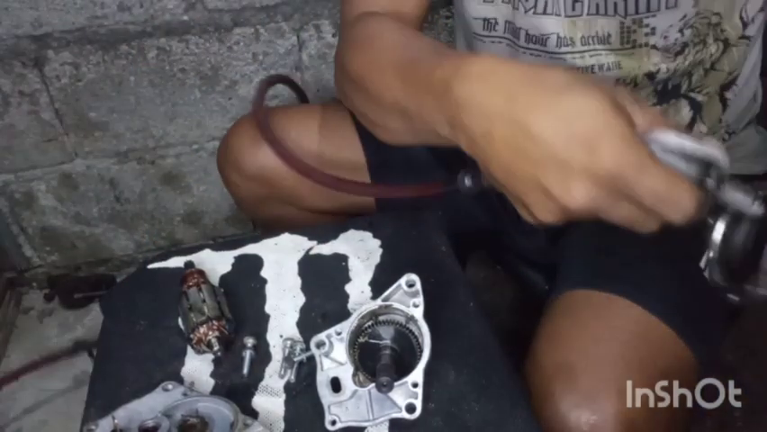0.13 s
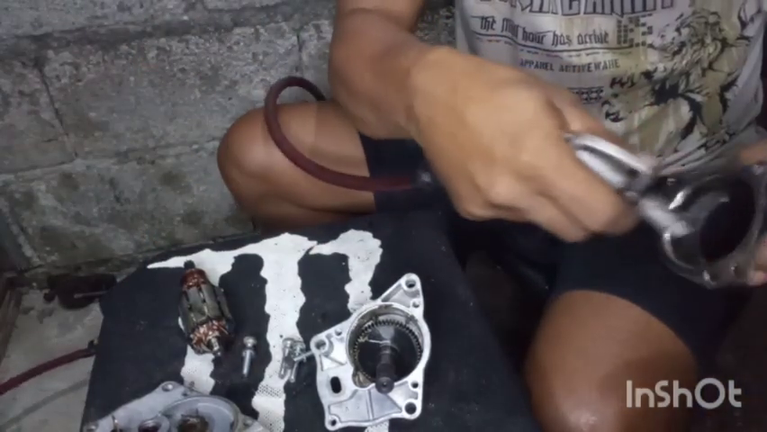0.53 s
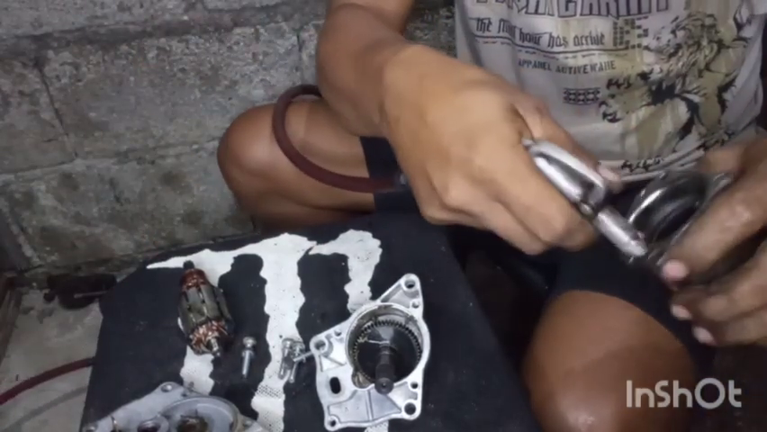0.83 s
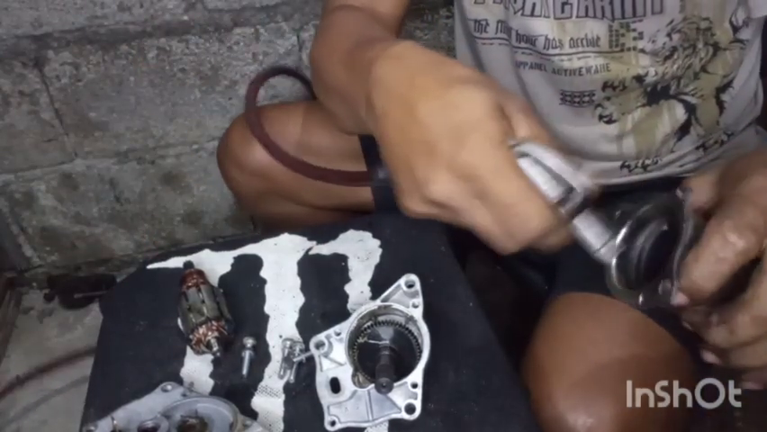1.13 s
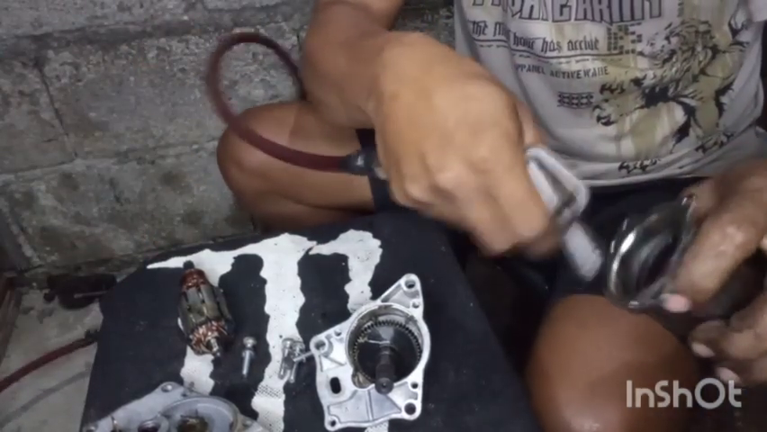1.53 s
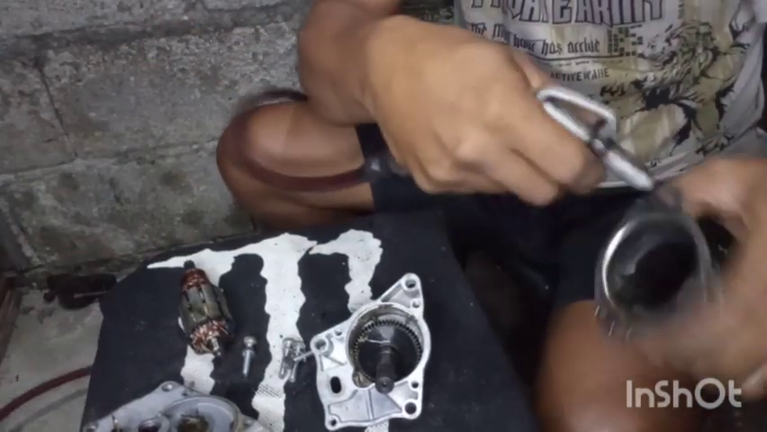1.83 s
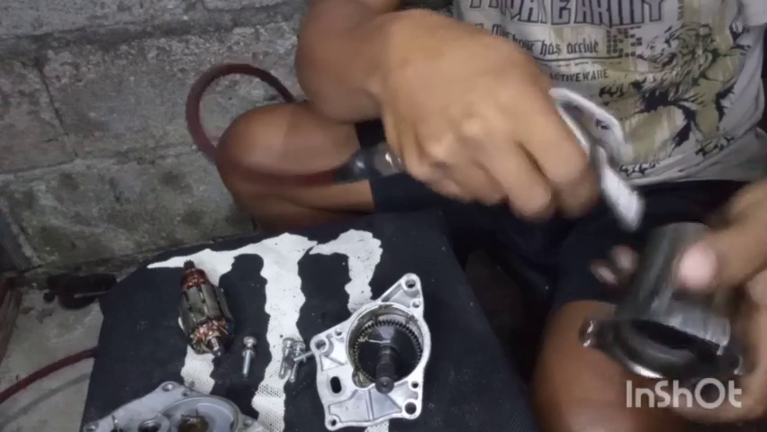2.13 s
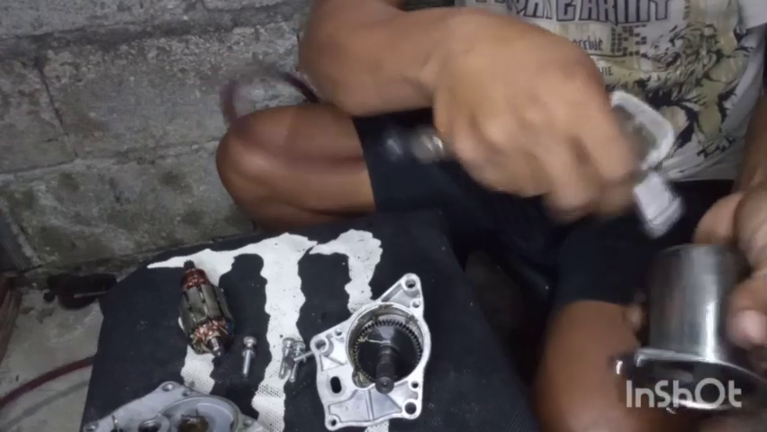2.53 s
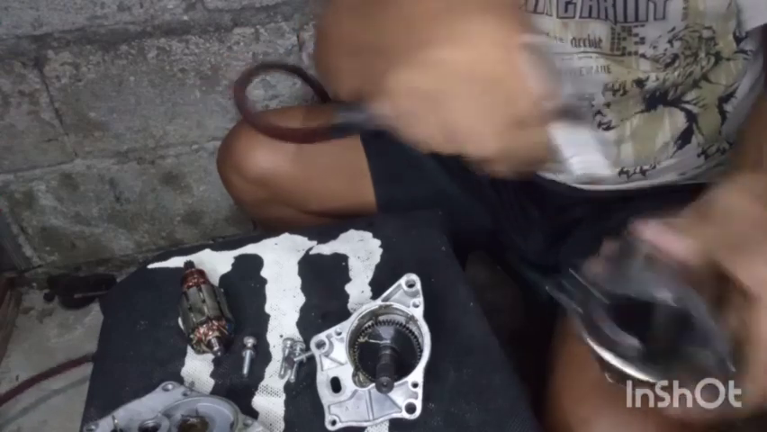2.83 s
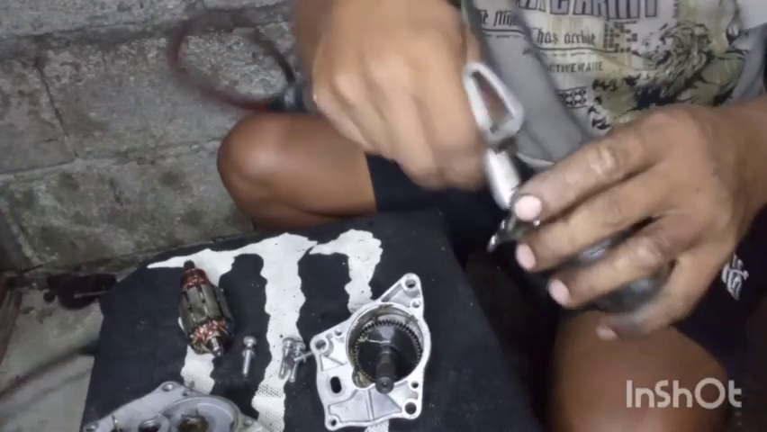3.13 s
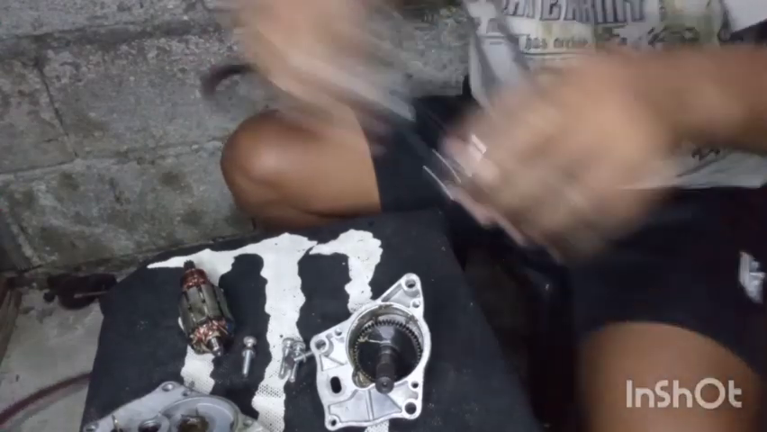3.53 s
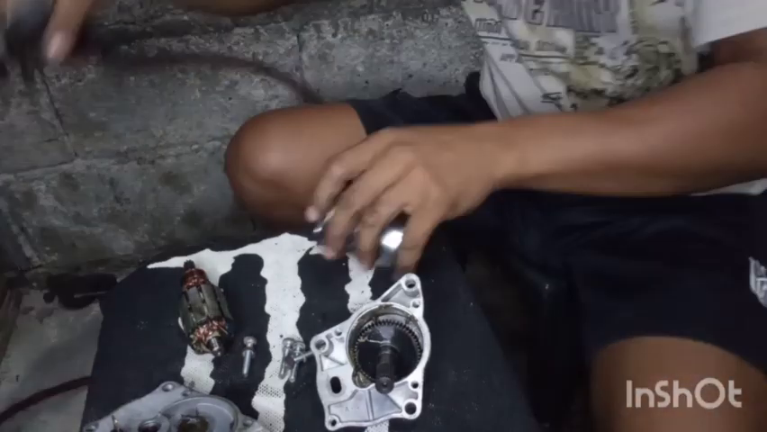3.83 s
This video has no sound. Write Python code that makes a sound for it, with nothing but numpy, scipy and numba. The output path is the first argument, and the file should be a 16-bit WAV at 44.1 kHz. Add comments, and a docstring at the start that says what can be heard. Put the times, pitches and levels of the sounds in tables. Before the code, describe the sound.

Compressed air hisses loudly from a blow gun, with a thin whistle and brief flares as it rushes over a steel motor housing. It stops abruptly, and the part is set down with a dull thump, close by in a small room.

```python
"""A blow gun cleans a steel motor housing, turned in the hand close to the microphone in a small concrete room.
The jet hisses through the nozzle's resonances, flares briefly, rushes over the metal and sounds its
hollow; air thrown back buffets the microphone. The valve shuts, the room rings briefly, and the part
is put down on a padded board with a dull thump and some faint ringing."""
import sys
import numpy as np
from scipy import signal
from scipy.io import wavfile
from scipy.ndimage import uniform_filter1d, map_coordinates
from numba import njit

SR = 44100
rng = np.random.default_rng(int(sys.argv[2]) if len(sys.argv) > 2 else 0)


def to_wav(sig):
    """Store sig (one row per channel, or 1-D mono) as 16-bit WAV at the path in sys.argv[1].

    Samples outside -1..1 are clipped; the rate is SR.
    """
    pcm = np.clip(np.atleast_2d(sig), -1, 1) * 32767
    pcm = np.round(pcm).astype(np.int16)
    wavfile.write(sys.argv[1], SR, pcm.T)  # frames by channels


N = 176400
T = np.arange(N) / SR


def from_db(db):
    """Decibels to gain."""
    return 10 ** (np.asarray(db) / 20)


def rms_one(x):
    """Scale to unit power."""
    return x / np.sqrt(np.mean(x ** 2) + 1e-20)


def evened(x, window_s=.02):
    """Hold the level of a narrow sound steady from moment to moment."""
    return x / np.sqrt(uniform_filter1d(x ** 2, int(window_s * SR)) + 1e-6)


def level(rows):
    """Gain over time from rows of seconds and dB."""
    return from_db(np.interp(T, *np.transpose(rows)))


def swell(peak_s, half_s):
    """Bell-shaped rise and fall."""
    return np.exp(-.5 * ((T - peak_s) / half_s) ** 2)


def drift(rate_hz):
    """Smooth random wander with spread 1."""
    r = np.exp(-40 * np.pi * rate_hz / SR)
    slow = signal.lfilter([1], [1, -2 * r, r * r], rng.standard_normal(N // 20 + 4002))[4000:]
    return np.interp(np.arange(N) / 20, np.arange(len(slow)), rms_one(slow))


def flutter(depth_db, rate_hz):
    """Turbulent gain of unit power."""
    return rms_one(from_db(depth_db * drift(rate_hz)))


@njit
def resonate(x, angle, r):
    """Two-pole resonance with a moving centre."""
    y = np.zeros(len(x))
    for i in range(2, len(x)):
        y[i] = x[i] - x[i - 2] + 2 * r * np.cos(angle[i]) * y[i - 1] - r * r * y[i - 2]
    return y


def blown(hz, width_hz):
    """Turbulence twice through one resonance; unit power."""
    angle = 2 * np.pi * hz / SR * np.ones(N)
    r = np.exp(-np.pi * width_hz / SR)
    return rms_one(resonate(resonate(rng.standard_normal(N), angle, r), angle, r))


def filtered_noise(order, hz, kind, length=N):
    """White noise through a low-, high- or band-pass."""
    return signal.sosfilt(signal.butter(order, hz, kind, fs=SR, output="sos"), rng.standard_normal(length))


def banded_noise(colour, patchy_db):
    """Noise in bands, narrow in the treble, each flickering on its own; unit power."""
    edges = np.r_[np.geomspace(25, 2500, 15), np.arange(3000, 16600, 450)]
    hz, db = np.transpose(colour)
    out = 0
    for low, high in zip(edges, edges[1:]):
        band_db = np.interp(np.log(low * high) / 2, np.log(hz), db)
        out += filtered_noise(2, [low, high], "band") * from_db(band_db + patchy_db * drift(21))
    return rms_one(out)


def room(x, dull_t60_s=.26, bright_t60_s=.22, split_hz=3500, first_echo_s=.012):
    """A diffuse tail between the concrete walls; the treble dies first."""
    age = T[:SR // 2]
    dull = filtered_noise(4, split_hz, "low", len(age)) * from_db(-60 * age / dull_t60_s)
    bright = filtered_noise(4, split_hz, "high", len(age)) * from_db(-60 * age / bright_t60_s)
    tail = (dull + bright) * (age > first_echo_s)
    return signal.fftconvolve(x, tail / np.linalg.norm(tail))[:N]


def close_echoes(x, nearest_s=.001, farthest_s=.0058, sway_s=.00009):
    """Echoes off hands, legs and board sway as the part turns and comb the hiss; its power is kept."""
    out = x.copy()
    for lag in np.geomspace(nearest_s, farthest_s, 7):
        delay = lag * rng.uniform(.9, 1.1) + sway_s * drift(1.3)
        out += from_db(-13.5) * rng.choice([-1, 1]) * map_coordinates(x, [(T - delay) * SR], order=3)
    return rms_one(out) * np.std(x)


# Cloth and hose rustling near the microphone. Each row: time in seconds, level in dB.
RUSTLE_LEVELS = [(3.44, -79), (3.5, -49.5), (3.58, -50), (3.63, -53), (3.69, -52), (3.9, -52.5),
                 (3.95, -50)]
# The rustle's colour. Each row: frequency in Hz, relative density in dB.
RUSTLE_SPECTRUM = [(30, -3), (75, 10.5), (140, -14), (300, 1.5), (600, 1.5), (1300, -10.5), (3000, -16),
                   (4800, -21.5), (6400, -15), (8000, -29.5), (9500, -22), (13000, -36), (16000, -36)]
# The housing's modes under the fingers. Each row: frequency in Hz, relative level in dB.
STEEL_MODES = [(1650, 0.5), (2010, -4), (2440, 0.5), (2900, -2)]
# Faint rings in the handling. Each row: peak in seconds, half length in seconds, pitch in Hz, level in dB.
FAINT_RINGS = [(3.584, 0.026, 579, -49.5), (3.688, 0.014, 230, -53.5), (3.715, 0.025, 2870, -66),
               (3.905, 0.02, 6200, -64), (3.941, 0.011, 1055, -51.5), (3.972, 0.02, 2920, -65),
               (3.976, 0.051, 646, -52)]
def handling(steel_q=55, ring_q=17, wisp_s=3.944, wisp_decay_s=.021):
    """Cloth and hose rustle, fingers rub the steel, faint rings sound and a last wisp of air escapes."""
    steel = sum(from_db(db) * blown(hz, hz / steel_q) * flutter(4.5, rate_hz=20) for hz, db in STEEL_MODES)
    rustle = level(RUSTLE_LEVELS) * (banded_noise(RUSTLE_SPECTRUM, patchy_db=2.5) + from_db(-18) * steel)
    rings = sum(from_db(db) * swell(s, half) * evened(blown(hz, hz / ring_q))
                for s, half, hz, db in FAINT_RINGS)
    wisp_fade = (T > wisp_s) * np.exp(-np.maximum(T - wisp_s, 0) / wisp_decay_s)
    wisp = from_db(-57) * wisp_fade * blown(12000, width_hz=11000)
    return rustle + rings + wisp


# The part landing on the board. Each row: start in seconds, relative level in dB.
CONTACTS = [(3.7785, -32), (3.7853, -28), (3.8268, -47), (3.8377, -42.5)]
# The padded board's modes. Each row: frequency in Hz, relative level in dB, seconds to fall 60 dB.
BOARD_MODES = [(133.5, -0.5, 0.11), (227, 5.5, 0.051), (290, 2.5, 0.03), (516, -3, 0.045),
               (640, -16, 0.045), (1195, -21, 0.059)]
def thump(attack_s=.0008, scuff_decay_s=.01):
    """Each soft contact rings the board's modes and scuffs its cloth, with a faint bright tick."""
    out = np.zeros(N)
    for start, db in CONTACTS:
        age = np.maximum(T - start, 0)
        body = sum(from_db(mode_db - 60 * age / t60) * np.sin(2 * np.pi * hz * age)
                   for hz, mode_db, t60 in BOARD_MODES)
        scuff = from_db(-13) * rms_one(filtered_noise(3, 2300, "low"))
        tick = from_db(-32) * blown(8000, width_hz=14000)
        surface = (scuff + tick) * np.exp(-age / scuff_decay_s)
        out += from_db(db) * (surface - body) * (1 - np.exp(-age / attack_s))
    return out


# Low puffs on the microphone. Each row: peak in seconds, half length in seconds, level in dB.
MIC_PUFFS = [(0.065, 0.014, -36.5), (0.319, 0.018, -42), (0.657, .03, -49), (0.942, 0.03, -47),
             (1.07, 0.02, -46), (2.454, .014, -46), (2.67, 0.042, -44), (2.778, 0.016, -47),
             (3.24, 0.011, -44)]
def puffs():
    """Air thrown back by the part buffets the microphone."""
    gusts = sum(from_db(db) * swell(s, half) for s, half, db in MIC_PUFFS)
    return gusts * evened(blown(186, width_hz=303))


# Air rushing over the metal. Each row: time in seconds, relative level in dB.
RUSH_LEVELS = [(0.0, -36.5), (0.08, -32), (0.1, -46.5), (0.23, -43), (0.26, -51), (0.31, -42),
               (0.44, -48.5), (0.67, -40.5), (0.76, -48.5), (0.94, -40.5), (1.03, -45), (1.07, -39.5),
               (1.2, -47.5), (1.23, -39.5), (1.29, -44.5), (1.35, -41), (1.44, -49.5), (1.49, -45.5),
               (1.68, -49.5), (1.74, -40.5), (1.77, -45.5), (2.01, -43.5), (2.07, -50), (2.15, -39.5),
               (2.17, -43), (2.29, -38.5), (2.33, -41), (2.45, -40), (2.54, -53), (2.58, -42),
               (2.61, -53.5), (2.63, -42.5), (2.71, -39.5), (2.74, -52), (2.78, -41.5), (2.79, -45.5),
               (3.21, -48.5), (3.24, -42.5), (3.29, -59), (3.31, -48), (3.33, -49.5), (3.44, -52.5)]
# The rush's colour. Each row: frequency in Hz, relative density in dB.
RUSH_SPECTRUM = [(30, -19), (70, -9), (140, -1.5), (300, -1), (700, -1.5), (1500, -2.5), (2800, -3),
                 (5000, -15.5), (9000, -8.5)]
def rush():
    """The jet breaks into broad, fluttering turbulence on the housing."""
    turbulence = banded_noise(RUSH_SPECTRUM, patchy_db=2.96) * flutter(depth_db=2, rate_hz=240)
    return from_db(4) * level(RUSH_LEVELS) * turbulence


# Air spraying off the steel. Each row: time in seconds, relative level in dB.
SPRAY_LEVELS = [(0.06, -37), (0.17, -42.5), (0.32, -38.5), (0.8, -40), (1.0, -35.5), (1.06, -40),
                (1.3, -39), (1.6, -39), (1.82, -34), (1.9, -44), (2.29, -40.5), (2.53, -40), (2.6, -44),
                (2.64, -34.5), (2.82, -44), (3.07, -44), (3.19, -39), (3.26, -53.5), (3.44, -55)]
def spray():
    """Air glances off the steel in one wide band of hiss."""
    return from_db(-2.5) * level(SPRAY_LEVELS) * blown(3570, width_hz=2400)


# The housing's cavity resonances. Each row: centre in Hz, width in Hz, relative level in dB.
HOLLOW_MODES = [(1043, 90, 0.5), (1140, 550, -11.5), (1560, 200, -14)]
# How strongly the jet sounds them. Each row: time in seconds, level in dB.
HOLLOW_LEVELS = [(.15, -51), (.27, -42), (.34, -46.5), (.44, -45.5), (.52, -52), (.88, -64), (.99, -41),
                 (1.06, -50), (1.145, -38.5), (1.185, -53), (1.22, -40), (1.275, -43), (1.31, -46.5),
                 (1.355, -35), (1.41, -49.5), (1.5, -43), (1.61, -52), (1.78, -40.5), (1.88, -59),
                 (2.75, -62), (2.94, -38), (3.02, -42.5), (3.15, -50.5), (3.185, -38.5), (3.23, -55),
                 (3.32, -39.5), (3.37, -39.5), (3.42, -50), (3.46, -35)]
def hollow(wander_hz=12):
    """Aimed inside the housing, the jet sounds its hollow."""
    cavity = sum(from_db(db) * blown(hz + wander_hz * drift(3.2), width) for hz, width, db in HOLLOW_MODES)
    return level(HOLLOW_LEVELS) * evened(cavity) * flutter(depth_db=1.9, rate_hz=190)


# Brief swells of hiss. Each row: peak in seconds, half length in seconds, centre in Hz, width in Hz,
# level in dB.
HISS_FLARES = [(0.061, .015, 2900, 4000, -31.5), (0.202, .035, 7400, 900, -36),
               (.32, 0.028, 10470, 700, -30), (.68, .03, 7500, 1500, -34.5), (1.0, 0.1, 8620, 900, -32.5),
               (1.16, .03, 4270, 2210, -32), (1.25, .035, 8300, 1810, -31), (1.44, 0.037, 5000, 2000, -31),
               (1.82, 0.024, 4240, 2300, -30), (2.326, 0.053, 10600, 700, -35),
               (2.669, 0.025, 9900, 900, -21.5), (2.911, .016, 4240, 2190, -31.5),
               (3.023, 0.021, 3660, 2600, -34)]
def flares():
    """Bands of hiss swell briefly: mid-range flares and shrill bursts of the jet's core."""
    return sum(from_db(db) * swell(s, half) * blown(hz, width) for s, half, hz, width, db in HISS_FLARES)


# The nozzle's thin whistle. Each row: time in seconds, level in dB.
THIN_WHISTLE_LEVELS = [(0.0, -30), (0.25, -34), (0.65, -31), (0.8, -27), (0.88, -32), (1.12, -30),
                       (1.6, -31), (1.72, -34.5), (2.08, -29), (2.25, -33), (3.4, -33), (3.45, -46)]
def thin_whistle(start_hz=12630, sag_hz_per_s=190, wander_hz=65):
    """A narrow nozzle resonance sinks with the pressure and fades just before the valve shuts."""
    hz = start_hz - sag_hz_per_s * T + wander_hz * drift(6.9)
    return level(THIN_WHISTLE_LEVELS) * blown(hz, width_hz=320) * flutter(depth_db=1, rate_hz=30)


# The nozzle's lower whistle. Each row: time in seconds, relative level in dB.
LOW_WHISTLE_LEVELS = [(0.0, -28.5), (0.1, -30), (0.12, -38), (0.25, -28), (0.34, -39), (0.44, -31.5),
                      (1.2, -35.5), (1.61, -33), (1.77, -38), (1.82, -26), (1.9, -37), (2.67, -43.5),
                      (3.1, -29.5), (3.44, -33.5)]
def low_whistle(start_hz=6600, sag_hz_per_s=82):
    """A breathy resonance sinks as the pressure drops."""
    return from_db(-1.5) * level(LOW_WHISTLE_LEVELS) * blown(start_hz - sag_hz_per_s * T, width_hz=740)


# The free jet's hiss from close by. Each row: frequency in Hz, relative density in dB.
JET_SPECTRUM = [(100, -43), (700, -15), (2000, -22), (3200, -12.5), (4400, -11), (5400, 1), (7000, -1),
                (7950, -10), (8400, -2), (8950, 7), (10700, 4), (11400, 1), (12500, 3), (13200, 2.5),
                (14050, -7.5), (14900, -7), (15600, -4)]
# The jet's shrill core. Each row: time in seconds, relative level in dB, centre in Hz.
JET_CORE = [(0.0, -25, 10000), (0.08, -24, 10000), (0.12, -28.5, 10220), (0.68, -28, 10350),
            (0.8, -40, 10300), (0.88, -29, 10230), (1.48, -33, 10200), (1.54, -27, 10150),
            (1.61, -28, 9200), (1.69, -42, 10100), (1.71, -26, 10100), (1.8, -36, 9630), (1.91, -37, 10200),
            (1.918, -27.5, 10400), (1.98, -25, 9400), (2.05, -32, 9470), (2.36, -24, 10290),
            (2.61, -33.5, 10300), (2.68, -31, 9900), (2.73, -32.5, 10200), (3.05, -28.5, 10000),
            (3.19, -34.5, 9600), (3.24, -21.5, 10070), (3.27, -41, 9940), (3.329, -25, 9660),
            (3.37, -37, 10300), (3.429, -29.5, 9430)]
def jet(core_wander_hz=159, shriek_wander_hz=560):
    """Broad hiss, a shrill core, a shriek darting about it as the jet grazes steel, and the low whistle."""
    hiss = from_db(-26.5) * banded_noise(JET_SPECTRUM, patchy_db=1.6)
    times, db, hz = np.transpose(JET_CORE)
    core_db, core_hz = np.interp(T, times, db), np.interp(T, times, hz)
    core = blown(core_hz + core_wander_hz * drift(28), width_hz=1300)
    core *= from_db(core_db - 2.5) * flutter(depth_db=2.5, rate_hz=42)
    shriek = blown(core_hz + shriek_wander_hz * drift(2.67), width_hz=380)
    shriek *= from_db(core_db - 5) * flutter(depth_db=3.5, rate_hz=25)
    return (hiss + core + shriek + low_whistle()) * flutter(depth_db=.4, rate_hz=66)


def scene(shut_s=3.448, shut_db_per_s=410):
    """Air fills the small room until the valve shuts; then the part is put down."""
    valve = from_db(-shut_db_per_s * np.maximum(T - shut_s, 0))
    nozzle = close_echoes(jet()) + thin_whistle()
    housing = rush() + hollow() + close_echoes(spray() + flares())
    air = valve * (nozzle + valve * housing)  # the air on the metal dies twice as fast
    return (air + from_db(-13.5) * room(air) + puffs() + thump() + handling())[None]


def record(dry, bass_hz=48, top_hz=15740):
    """One close microphone loses the deep bass; the top is cut steeply."""
    thin = signal.sosfilt(signal.butter(3, bass_hz, "high", fs=SR, output="sos"), dry)
    return signal.sosfilt(signal.ellip(14, .1, 80, top_hz, fs=SR, output="sos"), thin)


dry = scene()
out = record(dry)
to_wav(out)
```